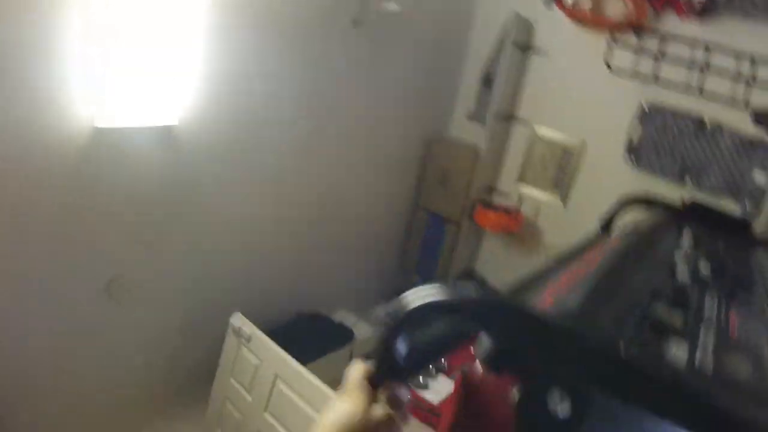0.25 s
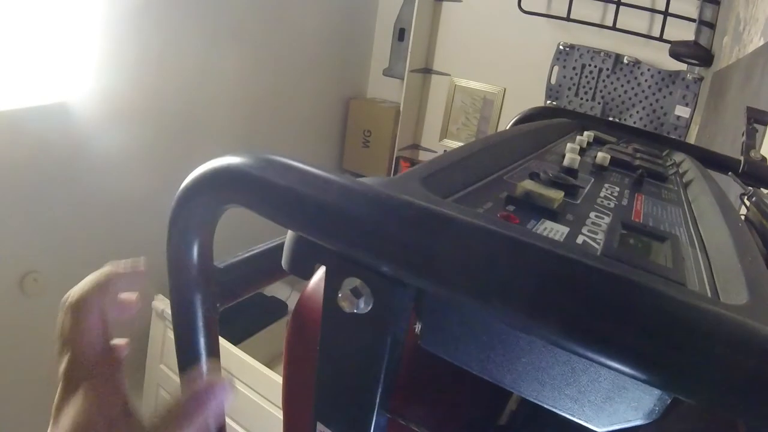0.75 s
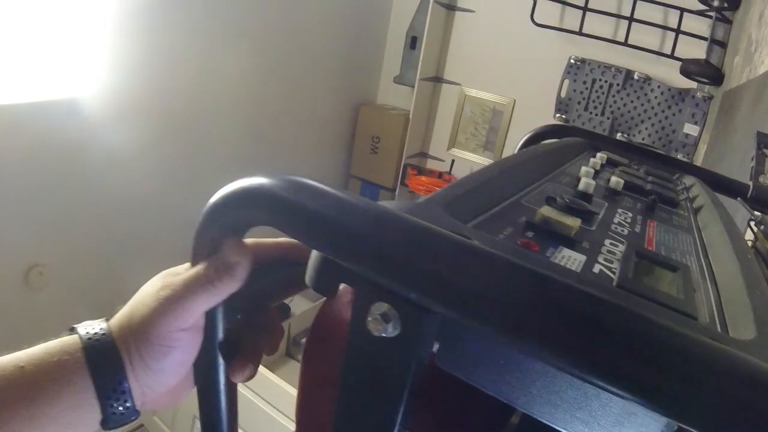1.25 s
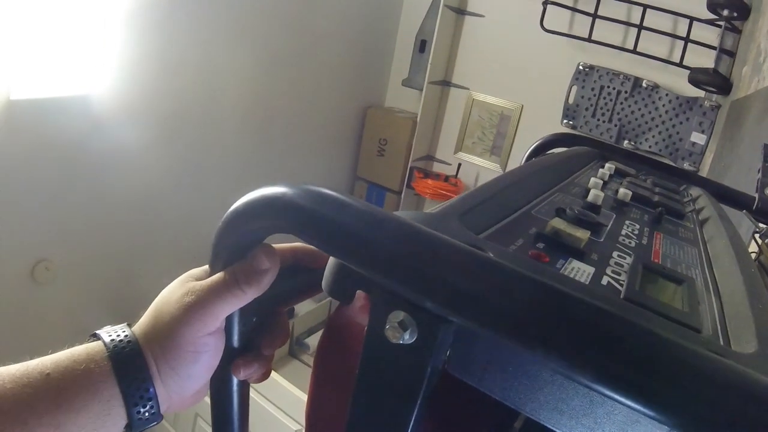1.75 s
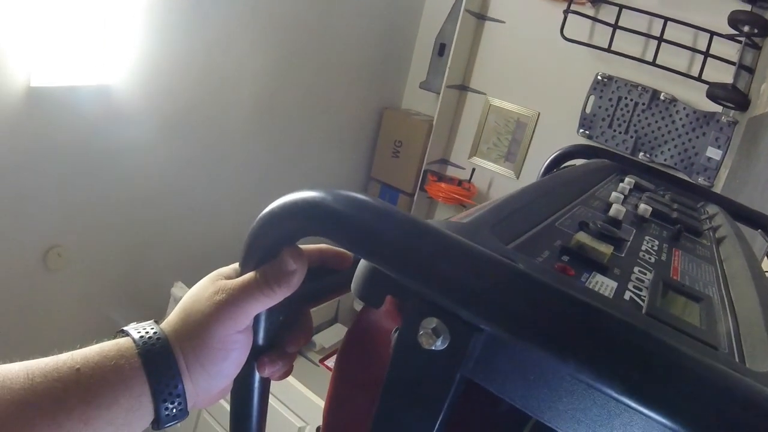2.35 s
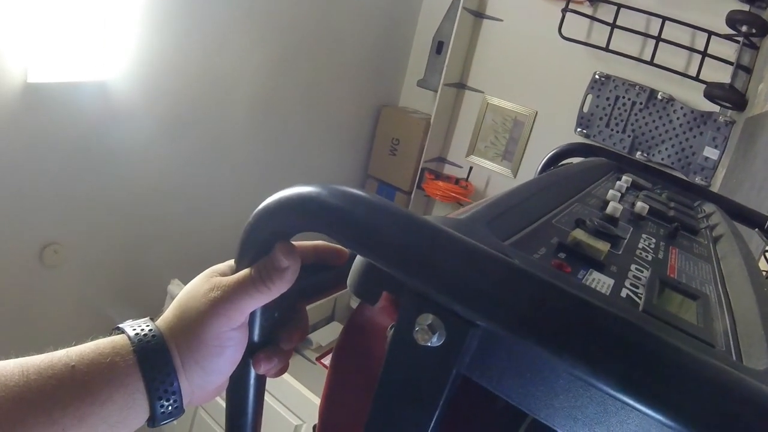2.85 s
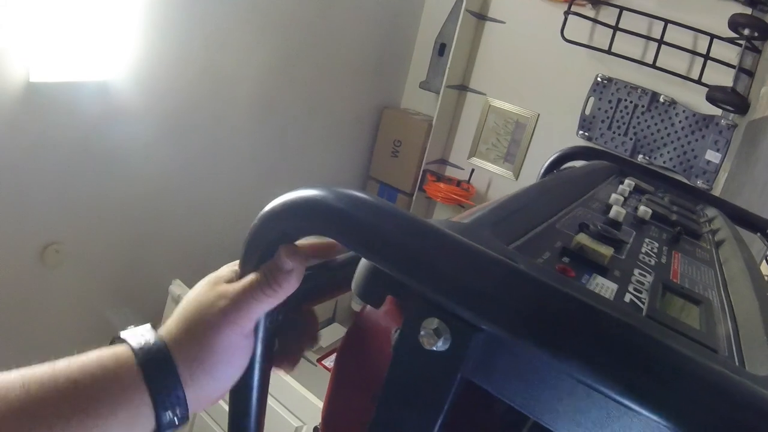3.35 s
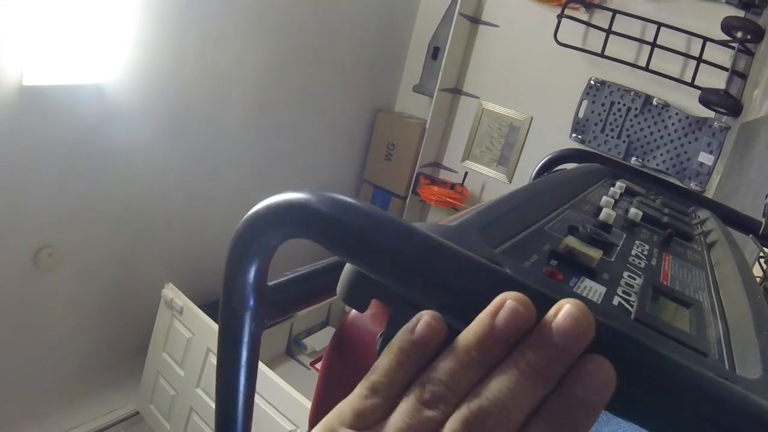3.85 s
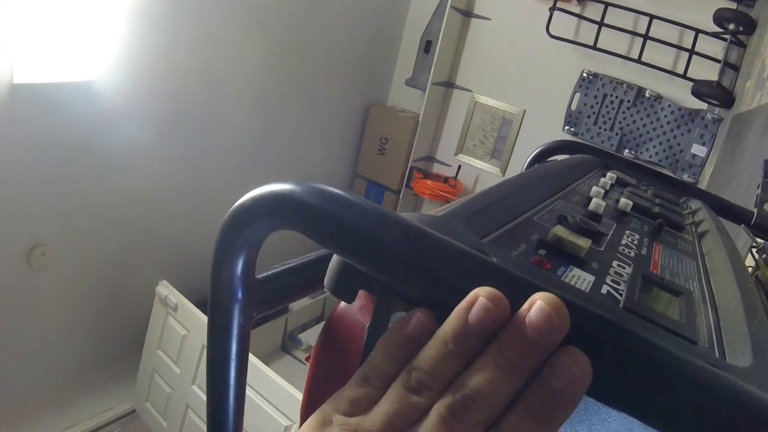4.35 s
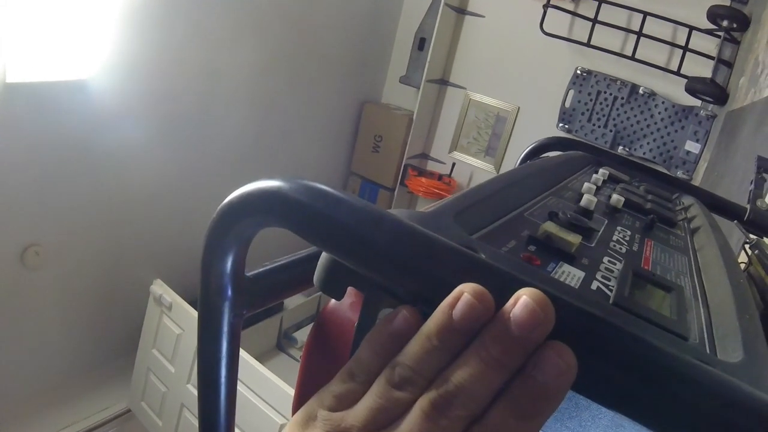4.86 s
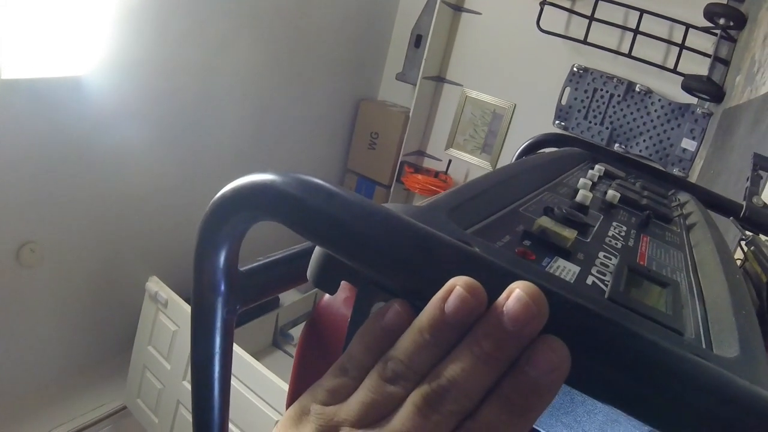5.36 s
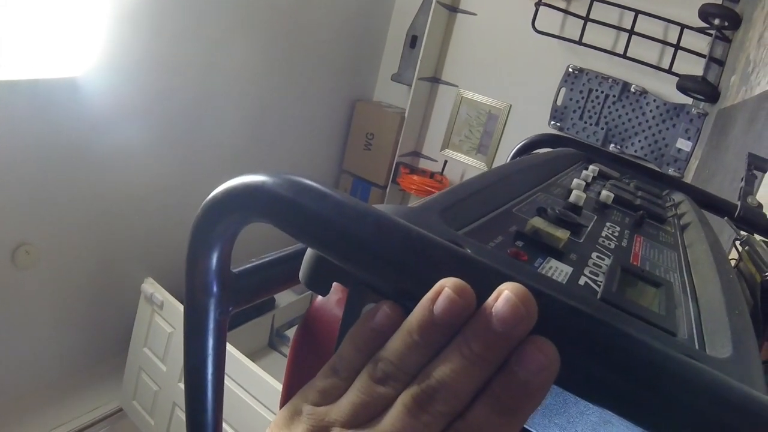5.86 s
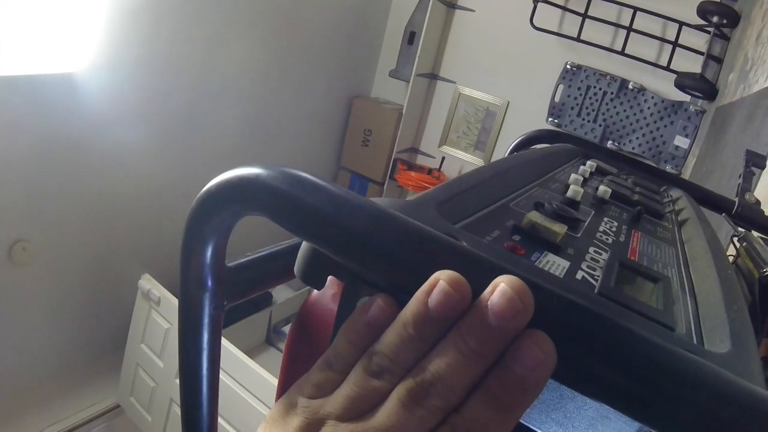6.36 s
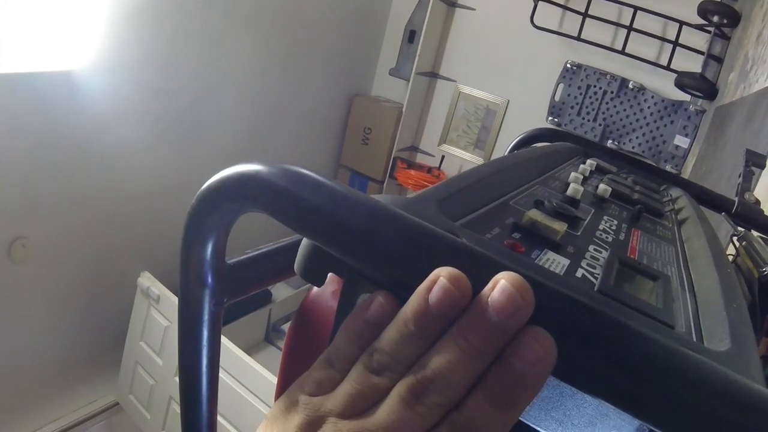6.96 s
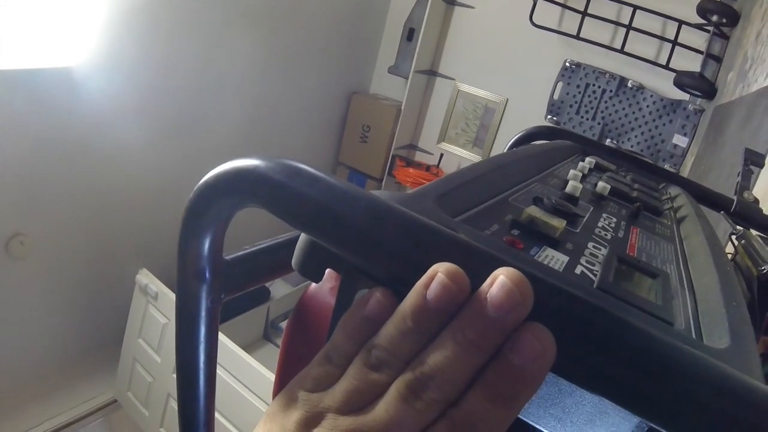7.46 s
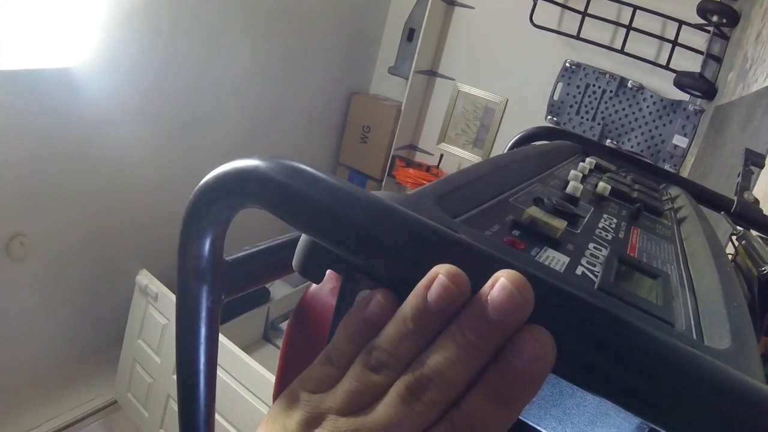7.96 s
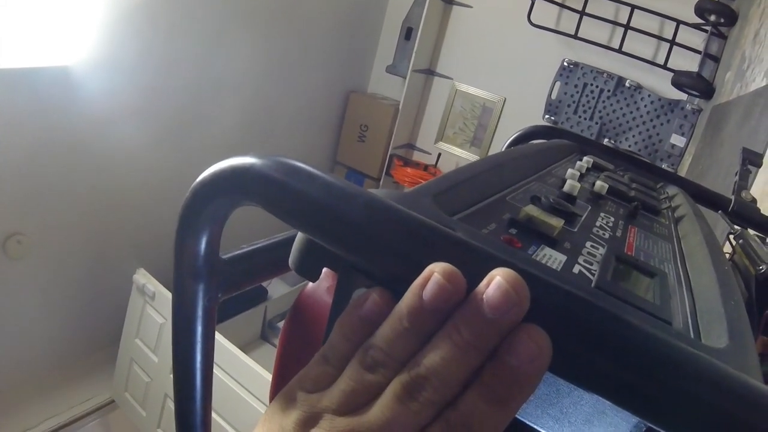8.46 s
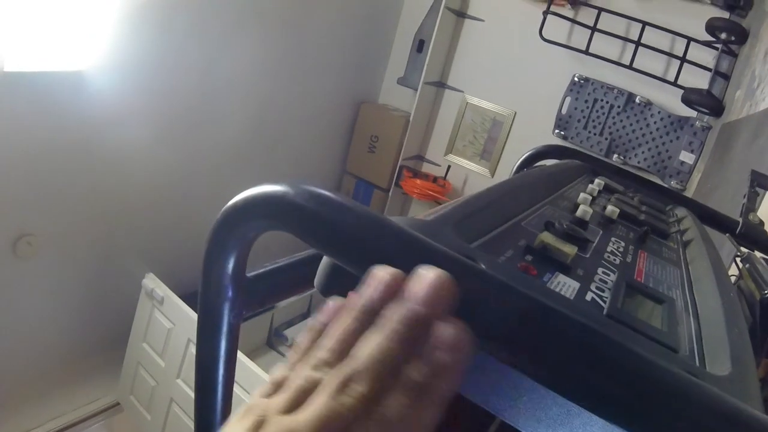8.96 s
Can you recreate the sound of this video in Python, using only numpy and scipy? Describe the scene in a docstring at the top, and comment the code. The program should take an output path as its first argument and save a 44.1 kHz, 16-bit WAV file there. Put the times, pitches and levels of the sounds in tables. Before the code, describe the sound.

A close microphone picks up faint cloth friction over low room rumble and hiss. A drill chatters in a short low burst, then a faster, shriller one, with crisp clicks. It then bores steadily into hollow steel for about six seconds, whining, scraping and humming through the tube, dipping deeply twice. Hard cracks come near the end, the motor winds down, and a new start is cut off.

```python
"""Cordless drill on a steel tube

A cordless drill bores into a steel tube frame in a garage: two short pulls, a long run, the start of another.
Whines are tones locked to the shaft speed; gears and swarf rattle as shaped, throbbing noise.
The tube hums and rings, clicks mark the switch and the snags of the bit, and a sleeve rustles first.
A noise tail gives the garage walls; steady noise gives the rumble and hiss. One microphone, close to the frame."""
import sys
import numpy as np
from scipy import signal
from scipy.fft import rfft, irfft, next_fast_len
from scipy.io import wavfile
from scipy.ndimage import uniform_filter1d

SR = 44100
rng = np.random.default_rng(int(sys.argv[2]) if len(sys.argv) > 2 else 0)


def output_pcm(signal):
    """Save a mono or channel-first signal as 16-bit PCM at the path in sys.argv[1].

    Samples are clipped to [-1, 1] before scaling.
    """
    pcm = np.clip(np.atleast_2d(signal).T, -1, 1) * 32767
    wavfile.write(sys.argv[1], SR, np.round(pcm).astype(np.int16))


N = 406161


def undb(db):
    """Turn decibels into a plain gain."""
    return 10 ** (np.asarray(db) / 20)


def level(x, db):
    """Scale x to an rms level in dB."""
    return x * undb(db) / np.sqrt(np.mean(x ** 2))


def columns(table):
    """Draw straight lines between the rows: each column after the time, read at every sample."""
    s, *rest = np.transpose(table)
    return [np.interp(np.arange(N) / SR, s, c) for c in rest]


def during(table, fade_s=0.00093):
    """1 from the first to the last row of a table; fades in after the first, out after the last."""
    t = np.arange(N) / SR
    since_start = t - table[0][0]
    until_end = table[-1][0] - t + fade_s
    return np.clip(np.minimum(since_start, until_end) / fade_s, 0, 1)


def lift_db(f, modes):
    """What resonances (positive dB) and hollows (negative dB) add at frequency f."""
    return sum(db / (1 + (2 * (f - hz) / width) ** 2) for hz, width, db in modes)


def colour(x, points, modes=()):
    """Filter x to the shape of a spectrum, lifted or hollowed by modes; the result has rms 1."""
    size = next_fast_len(N)
    f = np.arange(size // 2 + 1) * SR / size + 1  # 1 Hz up, so the log exists at zero
    hz, db = np.transpose(points)
    gain_db = np.interp(np.log(f), np.log(hz), db) + lift_db(f, modes)
    shaped = irfft(rfft(x, size) * undb(gain_db), size)[:N]
    return level(shaped, 0)


def band(x, hz, width):
    """A resonator: let through a narrow band of x."""
    return signal.lfilter(*signal.iirpeak(hz, hz / width, SR), x)


def walk(rate):
    """A wandering random curve: levels held 1 / rate s, smoothed twice; spread near 1."""
    k = int(SR / rate)
    steps = np.repeat(rng.standard_normal(N // k + 1), k)
    return 1.24 * uniform_filter1d(uniform_filter1d(steps, k), k)[:N]


# shape of the rumble and hiss: (frequency [Hz], level per hertz [dB])
FLOOR_SPECTRUM = [(15, -7), (28, -1.5), (55, -4.5), (90, -11), (140, -17), (300, -25.5), (800, -32),
                  (2400, -37.5), (4200, -42), (5600, -43.5), (6500, -32.5), (7500, -39), (10000, -47),
                  (13000, -50)]
# faint narrow bands in the quiet: (frequency [Hz], width [Hz], lift [dB])
FLOOR_HUMS = [(811, 12.4, 13), (2354, 105, 8)]
FLOOR_DB = -49


def background():
    """Steady noise: rumble of the building and hiss of the microphone."""
    return undb(FLOOR_DB) * colour(rng.standard_normal(N), FLOOR_SPECTRUM, FLOOR_HUMS)


# a sleeve slides over the frame and stops: (time [s], level [dB])
RUSTLE_LEVEL = [(0.0, -70), (0.006, -69), (0.188, -56), (0.194, -52), (0.204, -56.5), (0.364, -50),
                (0.372, -69)]
# shape of the cloth sound: (frequency [Hz], level per hertz [dB])
RUSTLE_SPECTRUM = [(200, 0), (1000, -2.5), (2600, 1.5), (4500, -1), (5800, 2), (6500, 4), (7500, -6),
                   (10000, -21.5), (13000, -28)]


def rustle():
    """Cloth friction: noise made grainy by quick random changes of level."""
    grain = rng.standard_normal(N) * undb(1.24 * walk(146))
    return colour(grain, RUSTLE_SPECTRUM) * undb(columns(RUSTLE_LEVEL)[0]) * during(RUSTLE_LEVEL)


# switch clicks, ticks and snags of the bit: (time [s], crack peak level [dB], centre frequency [Hz])
CLICKS = [(.192, -38, 7950), (.405, -56, 4500), (.575, -53, 4700), (.640, -19, 4020), (.653, -25, 5000),
          (0.665, -24, 5000), (.681, -19, 5060), (1.665, -54, 4600), (1.724, -28, 3000), (2.242, -16, 4019),
          (2.455, -27, 1800), (8.5059, -9, 4913), (8.512, -25, 2000), (8.601, -15, 5500),
          (8.6108, -6.5, 6295), (9.061, -46.5, 2292), (9.094, -39, 2520)]
CLICK_T60_S, THUMP_DB = 0.061, -31.5  # time for the ring to drop 60 dB; thump beside the crack's peak


def clicks():
    """A short crack that rings around its centre, with a low thump through the frame."""
    out, t = np.zeros(N + SR), np.arange(SR // 5) / SR
    dull = signal.butter(6, 8800, fs=SR, output="sos")
    noises = rng.standard_normal((len(CLICKS), len(t)))
    for (s, db, hz), noise in zip(CLICKS, noises):
        crack = noise * np.exp(-np.log(1000) * t / (0.33 * CLICK_T60_S))
        ring = band(noise, hz, 0.14 * hz) * np.exp(-np.log(1000) * t / CLICK_T60_S)
        thump = np.sin(2 * np.pi * 150 * t) * np.exp(-t / 0.013)
        hit = signal.sosfilt(dull, 0.52 * crack + ring)
        hit = hit / np.abs(hit).max()
        i = int(s * SR)
        out[i:i + len(t)] += undb(db) * (hit + undb(THUMP_DB) * thump)
    return out[:N]


GARAGE_T60_S, GARAGE_DB, GARAGE_DULL_HZ = 0.61, -15.5, 4870


def garage(x):
    """A diffuse tail off bare walls: dying noise, duller than the direct sound."""
    t = np.arange(SR) / SR
    tail = rng.standard_normal(SR) * np.exp(-np.log(1000) * t / GARAGE_T60_S)
    tail = tail * (t > .008)  # the walls answer a little late
    tail = signal.lfilter(*signal.butter(1, GARAGE_DULL_HZ, fs=SR), tail)
    tail = tail * undb(GARAGE_DB) / np.sqrt(np.sum(tail ** 2))
    return signal.fftconvolve(x, tail)[:N]


# pitch of each whine, as multiples of the first gear's tooth rate
WHINE_RATIOS = (1, 16 / 15, 2, 11 / 5, 3, 4)
# which whine level of CUT_LEVELS each one follows:
# 0 tooth whine, 1 commutator, 2 upper harmonics of the tooth whine, 3 whine at twice the tooth rate
WHINE_FAMILY = (0, 1, 3, 1, 2, 2)
# how loud each whine is at each speed: (tooth rate [Hz], then level of each whine [dB])
WHINE_LEVELS = [(685, -59.5, -71, -78, -63.5, -68, -62.5), (980, -54.5, -53, -43, -51, -46, -56),
                (1310, -52, -51, -45, -52, -40.5, -56), (1573, -59, -48, -42.5, -42.5, -47.5, -38.5),
                (1670, -44, -41, -38.5, -31.5, -42.5, -40.5), (2057, -32, -43, -34.5, -40, -41, -45),
                (2600.0, -28.0, -46.0, -38, -36, -31.0, -45.0)]
# higher whines that follow the last one: (multiple of the tooth rate, level beside the last whine [dB])
HIGHER_WHINES = [(5, 0), (6, -5)]
# resonances and hollows of the housing, felt as a whine passes: (frequency [Hz], width [Hz], lift [dB])
HOUSING = [(788, 180, 13), (1160, 140.0, 2), (1462, 110, 11.5), (1609, 53, 12.5), (1843.4, 210, 10.8),
           (2024, 160.0, -7), (2570, 260.0, 3.5), (3003, 370, 7.5), (3833, 235, -4.5), (4620, 690, 13.5),
           (5460, 800, 11), (6300, 250.0, 0), (6480, 430, 8.5), (7750, 460, -5)]
# output stage, heard only near full speed:
# (level [dB], tooth rate of full speed [Hz], loss at half speed [dB])
SLOW_GEAR = (-45, 2530, 54)
SLOW_RATIO = .3  # times the tooth rate


def whine(tooth_hz, family_db):
    """Tones locked to the shaft, following speed and housing resonances; tooth errors make each flutter."""
    turn = 2 * np.pi * np.cumsum(tooth_hz * (1 + 0.000998 * walk(40))) / SR
    hz, *levels = np.transpose(WHINE_LEVELS)
    parts = []
    for ratio, family, db in zip(WHINE_RATIOS, WHINE_FAMILY, levels):
        speed_db = np.interp(np.log(tooth_hz), np.log(hz), db)
        parts.append((ratio, speed_db + family_db[family]))
    last_db = parts[-1][1]
    parts += [(ratio, last_db + db) for ratio, db in HIGHER_WHINES]
    parts = [(ratio, db + lift_db(ratio * tooth_hz, HOUSING)) for ratio, db in parts]
    slow_db, full_hz, lost_db = SLOW_GEAR
    parts.append((SLOW_RATIO, slow_db - 2 * lost_db * (1 - tooth_hz / full_hz)))

    # 0 at a steady speed, 1 when the pitch is sliding fast
    slide = np.abs(np.gradient(np.log(tooth_hz))) * SR
    glide = np.clip(uniform_filter1d(slide, SR // 40) / 0.97, 0, 1)
    out = 0
    for ratio, db in parts:
        # a gliding tone crosses many narrow hollows and breaks up
        patches_db = 8 * np.minimum(walk(45), 0) - 0.49 * ratio
        dull_db = -70 * np.maximum(ratio * tooth_hz / 9300 - 1, 0)  # very high tones fade away
        wobble = (0.43 + 0.047 * ratio + (.2 + .06 * ratio) * glide) * walk(90)
        gain = undb(db + 2.0 * walk(55) + glide * patches_db + dull_db)
        out = out + np.sqrt(2) * gain * np.sin(ratio * turn + wobble)
    return out


# shapes of the main rattle, the lower rattle and the scrape of the cutting edge:
# (frequency [Hz], level per hertz [dB])
RATTLE_SPECTRUM = [(710, -25.5), (1200, -31), (1420, -10), (2040, -7), (2590, -9.5), (3350, -4.5),
                   (4850, -2.5), (5680, -6.5), (6530, -1.5), (11000, -19), (13000, -61)]
LOW_RATTLE_SPECTRUM = [(71, -44), (120, -18), (408, -5), (457, -13), (495, -6), (1010, -2.5), (1370, -4),
                       (1800, -1), (2340, -2), (3960, -120)]
SCRAPE_SPECTRUM = [(600, -21), (870, -7.5), (1100, -15), (2200, -11), (2650, -1.5), (3350, -8.5), (3750, 3),
                   (4000, -8), (4300, -16), (5200, -9), (5600, -24), (8300, -12), (8800, -6), (9400, -40.5)]
# resonances and hollows of housing and frame: (frequency [Hz], width [Hz], lift [dB])
BODY = [(784, 97, 3.5), (1139.7, 110, 5), (1798, 140, 6), (2056, 360, -8), (2480, 110, 0), (2890, 95, -8),
        (3405, 190, -6.5), (3630, 200, 0), (4360, 300, -3), (5220, 1400, 6), (5600, 330, -3.5),
        (6420, 300, 6.5), (6900, 130, 6), (6910, 99, -5), (7500, 360, 2), (8020, 140, 3), (9010, 152, 3.5),
        (10020, 410, -6)]
CHOPPER_HZ = 124.2  # the speed control switches the motor current


def rattle_and_scrape(tooth_hz):
    """Dense knocks of gear teeth and swarf: noise throbbing with the chopped current and each motor turn."""
    t = np.arange(N) / SR
    motor = 2 * np.pi * np.cumsum(tooth_hz) / SR / 15  # one motor turn per 15 teeth
    throb = (1 + 0.035 * np.sin(2 * np.pi * CHOPPER_HZ * t)) * (1 + 0.014 * np.sin(motor))
    knocks = rng.standard_normal((3, N)) * throb * undb(1.0 * walk(300) + 0.25 * walk(25))
    high = colour(knocks[0], RATTLE_SPECTRUM, BODY)
    low = colour(knocks[1], LOW_RATTLE_SPECTRUM, BODY)
    scrape = colour(knocks[2], SCRAPE_SPECTRUM)
    return high, low, scrape


# hum of the switched current: (multiple of the switching rate, level [dB])
CHOPPER_TONES = [(2, -64), (4, -59.5), (6, -63)]


def chopper_hum():
    """Tones at multiples of the motor current's switching rate, slowly wavering in level."""
    t = np.arange(N) / SR
    return sum(np.sqrt(2) * undb(db + 4.5 * walk(2.7)) * np.sin(2 * np.pi * k * CHOPPER_HZ * t)
               for k, db in CHOPPER_TONES)


# one table per trigger pull: (time [s], tooth rate of the first gear [Hz])
SPIN = [
    [(0.64, 527), (0.69, 681), (0.88, 692), (0.92, 660), (1.02, 410)],
    [(1.725, 500), (1.75, 722), (1.83, 1762), (1.87, 2200), (1.89, 2276), (1.97, 2501), (2.05, 2591),
     (2.14, 2620), (2.16, 2573), (2.19, 2480), (2.21, 2007), (2.24, 792), (2.27, 705)],
    [(2.46, 445), (2.5, 615), (2.62, 1027), (2.7, 1186), (2.74, 1318), (2.81, 1632), (2.86, 1673),
     (2.94, 1682), (3.01, 1548), (3.08, 1520), (3.32, 1573), (3.49, 1582), (3.7, 1528), (4.45, 1526),
     (4.64, 1551), (4.71, 1720), (4.79, 1970), (4.84, 2084), (4.89, 2125), (4.94, 2065), (5.02, 2082),
     (5.07, 1970), (5.19, 1489), (5.37, 861), (5.44, 1074), (5.55, 1438), (5.61, 1677), (5.63, 1704),
     (5.77, 1711), (5.83, 1629), (6.08, 727), (6.12, 834), (6.19, 1418), (6.25, 1408), (6.36, 1309),
     (6.7, 1336), (7.06, 1281), (8.0, 1340), (8.21, 1336), (8.38, 1283), (8.43, 1313), (8.58, 1180),
     (8.64, 1277), (8.67, 1306), (8.71, 1283), (8.73, 1246), (8.75, 1108), (8.775, 830), (8.81, 494)],
    [(9.094, 528), (9.15, 864), (9.17, 868), (9.21, 874)],
]
# how each pull comes in and dies away: (rise [s], fall [s])
PULLS = [(0.011, 0.022), (.04, 0.013), (.045, 0.014), (.05, 0.00108)]
# levels as the cut goes on: (time [s], tooth whine [dB], commutator whines [dB],
# upper harmonics of the tooth whine [dB], whine at twice the tooth rate [dB],
# scrape of the cutting edge [dB], rattle beside its speed law [dB], lower rattle beside its speed law [dB])
CUT_LEVELS = [(.7, 7, 12.5, 8, 6, -42, 1.5, 2.5), (.93, -1, 15, 14, 4, -44, 1, -5),
              (1., -3, 7.5, 6, -1.5, -44, 1.5, -0.5), (1.8, -6, 4, -4, -2, -43, -0.5, 1.5),
              (2., -9.5, -6, -9, -5, -37, -0.5, 0.5), (2.18, -5, -16, -14.5, 1, -35, -2, 1.5),
              (2.24, -1, -8, -8, -8, -40, 2, 1), (2.6, 3, 9, 2.5, -6, -43, 0.5, 1.5),
              (2.9, -2, -3.5, -2, 4, -53, 0.1, -2), (3.3, 2, 3.5, -4, -2.5, -43, 0.6, 1.5),
              (3.6, 2, -0.5, -2.5, 2, -49, 0, -0.5), (4., 7, -0.5, -2.2, 2.5, -50, 0.5, 0.5),
              (4.6, 3.5, 1, -3.5, 3.3, -42, 1, 1), (5., 0, -1.5, 3, -3, -47, 0.4, 0),
              (5.4, 8.5, 7, 3, 4.5, -37, 1, -1.5), (5.7, -12, 0.5, 2.5, -3, -38, 0.8, 1),
              (6., 9, 5, 0, 1, -38, 0.5, -0.5), (6.1, 5.5, 8, 2, 9, -40, 0.5, -3.5),
              (6.2, 0, 2.5, 3.5, 1.8, -38.5, 1, 0.5), (6.6, 2, 3, -8, -1, -37, 0.9, 1.5),
              (7., 1.5, 2, 2, -1.5, -36.5, 1.1, 2.2), (7.2, -4, -1, 0, -15, -34.5, 1.2, 1),
              (8., 0, -10, -11, -7, -34, 0.5, 3), (8.4, 3, -9.5, -4, 1.5, -33.5, 0, 3.5),
              (8.58, 8, -6.5, -5.5, 11, -39.5, -1.5, 2.5), (8.61, 7, -3, -5, -12, -42, -1, 2.1),
              (8.67, 8, 0, -6, 1, -40.5, -0.8, -1.5), (8.75, 14, -1.1, 7, 10, -42, -3, -1.5),
              (9.15, -2, -8, 5.5, -11, -40.5, -2.5, 2)]
RAMP_DB = 11.5  # depth of a rise or fall
MID_HZ = 1400  # middle tooth rate, where the speed laws below start from
RATTLE_DB, RATTLE_DB_PER_OCT = -26, 8
LOW_DB, LOW_DB_PER_OCT = -41.5, 0.5  # lower part of the rattle
JOLT_DB, JOLT_OCT_PER_S = 4, 18  # lower rattle gets louder while the speed jumps; full at this rate


def drill():
    """Whine, rattle, scrape and chopper hum while the trigger is held; speed sets most levels."""
    t = np.arange(N) / SR
    tooth_hz = uniform_filter1d(columns(np.concatenate(SPIN))[0], SR // 100)
    octaves = np.log2(tooth_hz / MID_HZ)
    speed_change = np.abs(np.gradient(octaves)) * SR
    jolt = np.clip(uniform_filter1d(speed_change, SR // 50) / JOLT_OCT_PER_S, 0, 1)

    *family_db, scrape_db, rattle_db, low_db = columns(CUT_LEVELS)
    rattle_db = rattle_db + RATTLE_DB + RATTLE_DB_PER_OCT * octaves
    low_db = low_db + LOW_DB + LOW_DB_PER_OCT * octaves + JOLT_DB * jolt
    high, low, scrape = rattle_and_scrape(tooth_hz)
    chop = 1 + 0.21 * np.sin(2 * np.pi * CHOPPER_HZ * t)  # the torque pulses with the current
    sound = chop * whine(tooth_hz, family_db) + chopper_hum()
    sound = sound + undb(rattle_db) * high + undb(low_db) * low + undb(scrape_db) * scrape

    trigger = 0
    for spin, (rise_s, fall_s) in zip(SPIN, PULLS):
        ramp = np.minimum((t - spin[0][0]) / rise_s, (spin[-1][0] - t) / fall_s)
        trigger = trigger + during(spin) * undb(RAMP_DB * (np.clip(ramp, 0, 1) - 1))
    return sound * trigger


# notes of the frame, the humming one first: (frequency [Hz], width [Hz], level beside the shaking [dB])
TUBE_MODES = [(103.4, 6.33, -0.5), (73.3, 4.8, -5.5), (163, 21.2, -3), (331, 25, -10.5), (414.5, 12, -10.5)]
# how hard the tube is shaken: (time [s], level [dB])
TUBE_SHAKING = [(1.7, -65), (2.07, -45), (2.17, -44.5), (2.42, -55), (2.67, -64), (2.89, -52), (3.51, -58),
                (4.05, -51.5), (4.6, -56), (5.08, -47.5), (5.4, -59.5), (5.85, -53.5), (6.6, -56.5),
                (7.66, -54.5), (8.21, -58), (8.5, -59), (8.6, -42.5), (8.66, -40.5), (9.1, -57.5)]


def tube():
    """One mode of the frame hums as a wavering tone; the others ring from random shaking."""
    (hum_hz, waver_hz, hum_db), *rest = TUBE_MODES
    hum_gain = undb(hum_db + 2.0 * walk(36) + 1.1 * walk(7.2))
    hum_turn = 2 * np.pi * np.cumsum(hum_hz + 0.399 * waver_hz * walk(14)) / SR
    hum = np.sqrt(2) * hum_gain * np.sin(hum_turn)
    shake = rng.standard_normal(N)
    # the square root evens out the power of narrow and wide resonances
    rings = sum(undb(db) * np.sqrt(SR / width / np.pi) * band(shake, hz, width) for hz, width, db in rest)
    return (hum + rings) * undb(columns(TUBE_SHAKING)[0]) * during(TUBE_SHAKING, fade_s=0.046)


def scene():
    """Add everything up; only the drill and clicks get the garage tail. Both channels are the same."""
    near = drill() + clicks()
    mix = near + garage(near) + tube() + rustle() + background()
    return np.tile(mix, (2, 1))


TOP_HZ = 13300


def record(dry):
    """Cut the top of the sound steeply with a low-pass filter."""
    return signal.sosfilt(signal.ellip(8, .2, 70, TOP_HZ, fs=SR, output="sos"), dry)


dry = scene()
out = record(dry)
output_pcm(out)
```